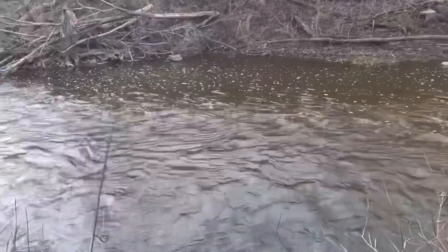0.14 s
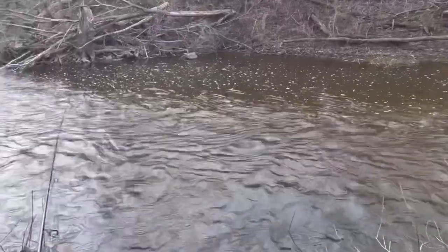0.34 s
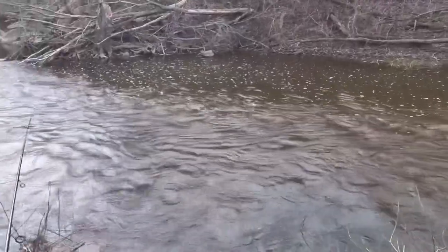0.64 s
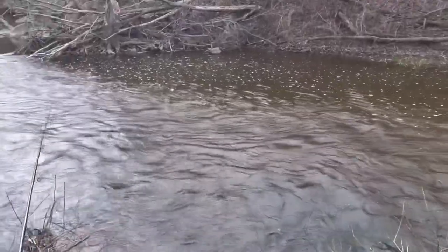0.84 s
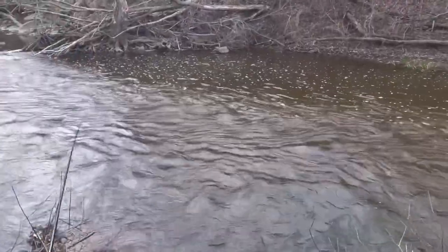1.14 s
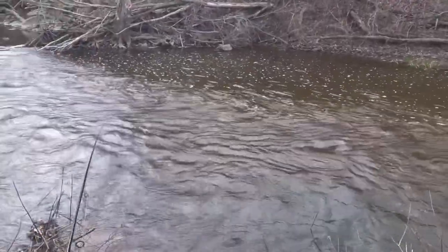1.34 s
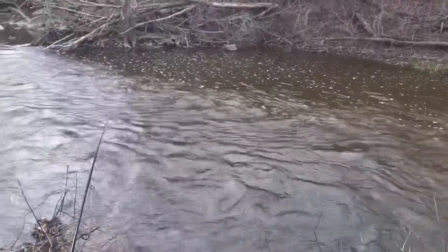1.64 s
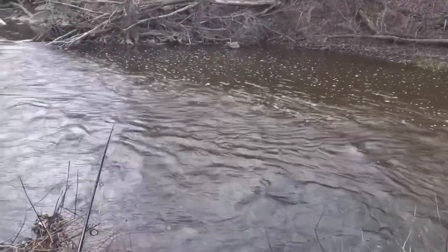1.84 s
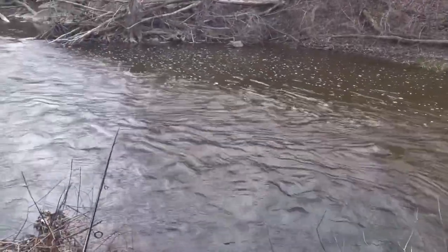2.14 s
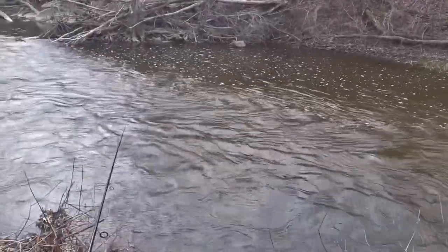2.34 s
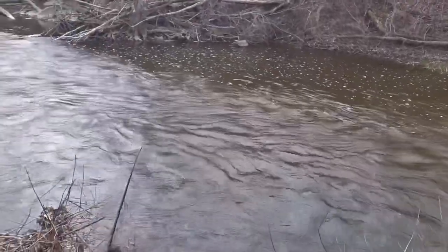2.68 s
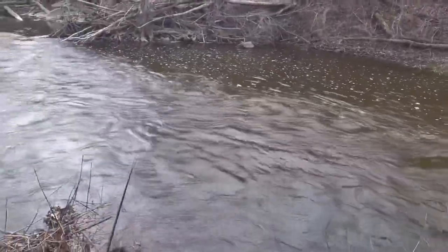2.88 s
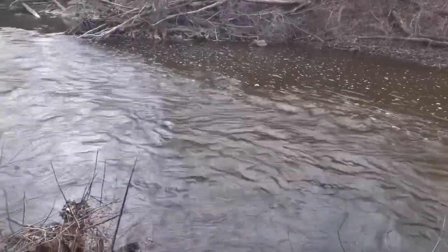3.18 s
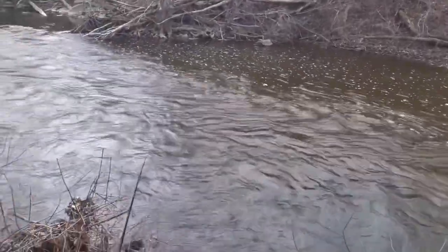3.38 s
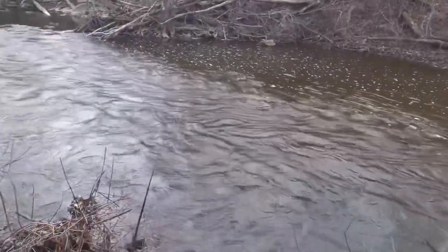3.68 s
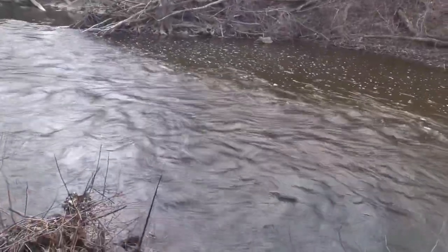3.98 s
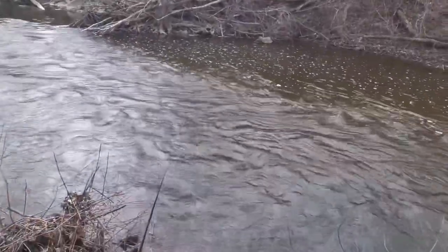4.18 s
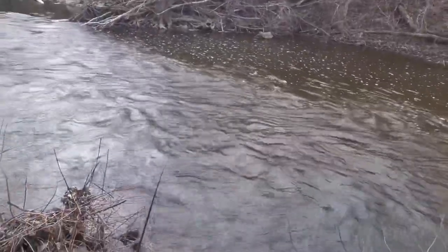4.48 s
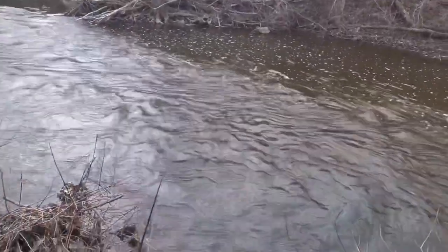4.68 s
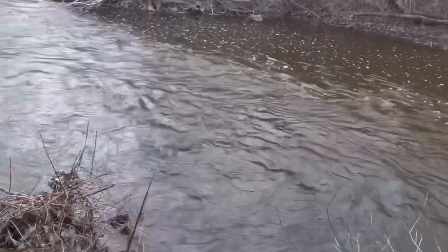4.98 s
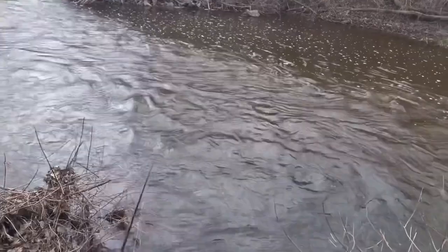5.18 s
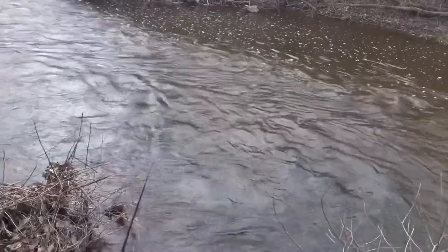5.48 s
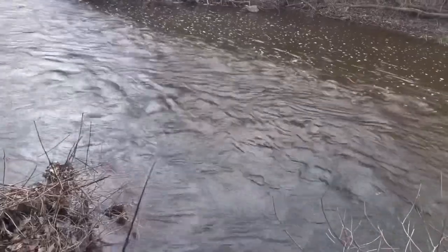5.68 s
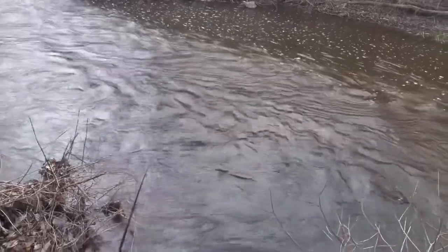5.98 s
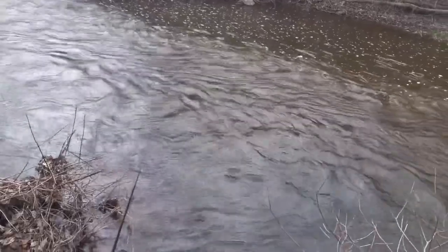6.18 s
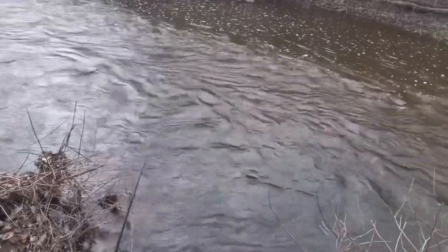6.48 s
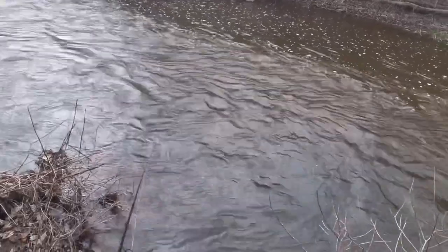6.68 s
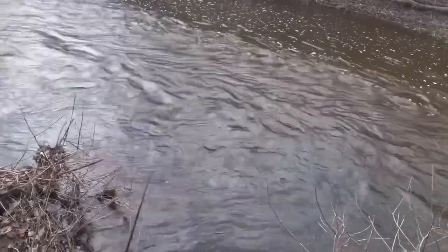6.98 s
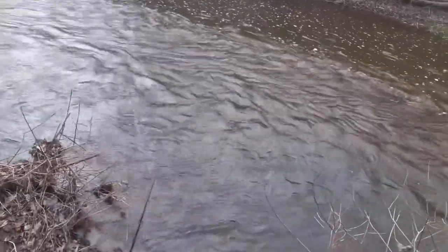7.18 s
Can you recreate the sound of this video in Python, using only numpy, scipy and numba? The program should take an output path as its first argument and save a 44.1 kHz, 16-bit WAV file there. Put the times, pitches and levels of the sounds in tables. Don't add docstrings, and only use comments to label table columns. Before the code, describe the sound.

Continuous river water runs over stones outdoors, a mid-toned wash full of gurgling bubbles, heard from the bank through a small camera's boxy stereo microphone. Deep, irregular wind buffeting shudders underneath, heavy early and again after six seconds. A brief hard scrape-click sounds almost immediately, with a much softer tick soon after and barely noticeable ones later. A very faint electronic buzz hides beneath the steady water.

```python
import sys
import numpy as np
from scipy import signal
from scipy.fft import rfft, irfft, next_fast_len
from scipy.io import wavfile
from scipy.ndimage import uniform_filter1d
from numba import njit

SR = 44100
rng = np.random.default_rng(int(sys.argv[2]) if len(sys.argv) > 2 else 0)


def makeup_ratio(level_db):
    decades = np.asarray(level_db, float) / 20
    return 10 ** decades


def to_wav(s):
    ch = np.atleast_2d(s).T
    pcm = np.round(np.clip(ch, -1, 1) * 32767)
    wavfile.write(sys.argv[1], SR, pcm.astype(np.int16))


N = 323253
T = np.arange(N) / SR
F = np.maximum(np.fft.rfftfreq(next_fast_len(N, True) // 2 * 2, 1 / SR), 1)

# t/s, level/dB
FLOW = [(0, -57), (.8, -60), (1.2, -61), (2.4, -59.5), (3.3, -58), (4, -60.5), (5.2, -61), (6.2, -60),
        (7.33, -59.5)]
# f/Hz, density/dB
WASH_SPECTRUM = [(120, -7.5), (200, 0), (657, -9.5), (851, -5), (982, 0.5), (1120, -5.5), (1650, -1.5),
                 (1800, -6), (2490, -16), (2800, -12.5), (3400, -17.5), (4070, -40), (4400, -30),
                 (5720, -66), (9680, -120)]
# f/Hz, share/1
WASH_LIKENESS = [(100, 1), (150, 0.7), (300, 0.37), (650, 0.5), (900, 0.79), (4000, .3)]
# f/Hz, left minus right/dB
WASH_PAN = [(100, 10), (160, -6), (550, -3.5), (800, -1), (3100, 8.5), (4000, -6)]
# t/s, level/dB, length/s
SURGES = [(0.28, -68, 0.049), (0.563, -65, 0.074), (0.79, -74, 0.05), (1.27, -71, 0.06),
          (1.442, -63.5, 0.07), (1.9, -79, 0.067), (2.786, -70.5, 0.26), (3.356, -66, 0.3),
          (4.18, -80.3, 0.06), (4.517, -66, 0.075), (4.688, -64, 0.049), (5.242, -68.1, 0.07),
          (5.57, -69, 0.06), (6.254, -72.5, 0.5)]
# t/s, peak level/dB, f/Hz; the short ones near 960 Hz are the lowest housing cavity
PLOPS = [(.26, -49, 960), (0.447, -53, 950), (.53, -50.5, 960), (.83, -52, 1460), (1.031, -48, 1760),
         (1.035, -52, 1490), (1.191, -54, 932), (1.335, -55, 1320), (1.391, -54.5, 1020), (2.364, -50, 970),
         (2.978, -49, 966), (3.133, -48.5, 995), (3.43, -47.5, 1620), (3.405, -52, 1680),
         (3.944, -51.5, 1170), (4.13, -56.5, 720), (4.249, -49, 970), (4.923, -50, 944), (5.229, -51, 930),
         (5.31, -54, 1560), (5.45, -50, 960), (5.618, -49.5, 980), (5.95, -54, 895), (5.76, -67, 697),
         (5.821, -50.5, 1514)]
# f/Hz, width/Hz, level/dB, left minus right/dB
CAVITIES = [(960, 79, -6, 7), (1200, 20, -4, 8.5), (1327, 125, -5, 7.5), (1434, 65, -3.5, -2.5),
            (1620, 120, -5.5, 3.5), (2078, 105, -7.5, -6), (2737, 160, -9, 1), (3000, 780, -9.5, -0.5),
            (3760, 2500, -25, 4.5)]
# f/Hz, density/dB
HISS_SPECTRUM = [(2120, -32), (3600, -3), (4190, -2), (5380, 2), (5790, -2.5), (6350, -3.5), (7020, -5),
                 (7640, -10), (7980, -13), (8420, -22), (9060, -23.5), (11800, -48), (19900, -120)]
# f/Hz, left minus right/dB
HISS_PAN = [(4000, -0.5), (4600, -3.5), (5800, 2.5), (6300, -3), (9000, 2.5), (10300, 16), (10700, 9)]
# t/s, throb level/dB, length/s, throb f/Hz
GUSTS = [(0.126, -39.5, 0.2, 22.13), (0.323, -38.5, 0.252, 29.83), (0.624, -35.5, 0.15, 28.76),
         (0.767, -36.5, 0.05, 28.04), (0.891, -41, 0.064, 23.98), (1.074, -31.5, 0.067, 25.81),
         (1.493, -39.5, 0.054, 26.44), (1.65, -38, 0.025, 26.3), (1.765, -44, 0.2, 26.5),
         (2.313, -44.5, 0.28, 25.99), (2.526, -38.5, 0.096, 28.2), (2.767, -44.5, 0.2, 24.39),
         (2.947, -42, 0.14, 28.91), (3.124, -45, 0.053, 28), (3.345, -37.5, 0.11, 26.37),
         (3.784, -41.5, 0.14, 28), (3.96, -50, 0.21, 26.64), (4.456, -47, 0.348, 30.28),
         (4.793, -44.5, 0.1, 27.78), (4.894, -45, 0.042, 28.05), (5.091, -46, 0.096, 23.54),
         (5.25, -51, 0.55, 25.01), (5.648, -41, 0.27, 25.35), (5.855, -47, 0.1, 27.34),
         (6.006, -40.5, 0.037, 23.65), (6.137, -42.3, 0.12, 22.44), (6.338, -35.2, 0.05, 28.29),
         (6.542, -53.5, 0.65, 27.9), (6.866, -42.5, 0.13, 26.84), (7.155, -45, 0.063, 25.22)]
# t/s, level/dB
BREEZE = [(.3, -60), (.55, -62.5), (.8, -64), (1.2, -61.5), (1.6, -74), (2.05, -79), (2.5, -64),
          (3.15, -72.5), (3.4, -61.5), (3.6, -79.5), (4.05, -59.5), (4.6, -67.5), (5.1, -64), (5.6, -62),
          (6.15, -74.5), (6.45, -56.5), (7.1, -72), (7.33, -55.5)]
# f/Hz, width/Hz, level/dB
BUZZ_BANDS = [(4560, 150, -91), (5200, 300, -80), (5550, 200, -83), (5990, 190, -79), (7130, 250, -91),
              (9100, 400, -110), (10180, 300, -106), (11050, 300, -104)]
# t/s, peak level/dB, f/Hz, click time/ms, width/Hz
CLICKS = [(0.036, -42, 6100, 1.4, 3500), (0.0431, -33.5, 3470, 1.1, 5900), (0.045, -28, 4450, 2.8, 6900),
          (0.0474, -23.5, 3070, 1.1, 2500), (0.0505, -29.5, 4700, 1.7, 3000), (0.053, -47, 4500, 1.5, 6000),
          (0.057, -37.5, 3540, 3.7, 5000), (0.063, -41.5, 4030, 3.7, 6000), (0.067, -46, 4830, 3.7, 2500),
          (.086, -53, 6900, 3.5, 5000), (0.108, -44, 4500, 2.1, 4000), (0.117, -60, 5500, 2.2, 2500),
          (.146, -50, 5460, 2, 4000), (0.488, -44.5, 3000, 3.9, 5000), (0.4874, -52, 8060, 2, 3500),
          (2.051, -60, 7100, 3.8, 2440), (2.997, -53, 4740, 3.5, 890), (5.37, -57.5, 6840, 3.5, 1475),
          (6.601, -61, 7800, 1.9, 1500), (7.327, -60.5, 11000, 2.3, 6060)]
# f/Hz, width/Hz, level/dB
CASE_MODES = [(2050, 64, 2.5), (2926, 135, 1), (3820, 2000, -5.5), (5000, 320, -11.5), (6900, 540, -9),
              (7800, 130, -2), (11000, 2000, -9)]

SIDES = np.array([[1], [-1]])


def unit(x):
    return x / np.sqrt(np.mean(x ** 2))


def spectrum(table):
    hz, value = np.transpose(table)
    return np.interp(np.log(F), np.log(hz), value)


def envelope(table):
    s, value = np.transpose(table)
    return np.interp(T, s, value)


def ring(hz, width):
    return 1 / (1 + 1j * (F ** 2 - hz ** 2) / (F * width))


def shape(x, response):
    size = 2 * len(F) - 2
    return irfft(rfft(x, size) * response, size)[..., :N]


def walk(rate):
    k = int(SR / rate)
    held = np.repeat(rng.standard_normal(N // 100), k)[:N]
    return unit(uniform_filter1d(uniform_filter1d(held, k), k))


def restless(swell_db, flicker_db, channels=1):
    out = 0
    for hz in 60 * 2 ** np.arange(0, 8, .5):
        mask = np.cos(np.pi * np.clip(np.log2(F / hz), -.5, .5))
        band = shape(rng.standard_normal((channels, N)), mask)
        out = out + band * makeup_ratio(swell_db * walk(1.614) + flicker_db * walk(14))
    return out


def swells(s, db, length_s):
    age = (T - s[:, None]) / length_s[:, None]
    return makeup_ratio(db)[:, None] * np.exp(-4 * np.log(2) * age ** 2)


@njit
def bubbles(start, hz, cycles, size, glide, n):
    out = np.zeros(n)
    for k in range(len(start)):
        life = cycles[k] * SR / hz[k]
        phase = 0.
        for i in range(min(int(5 * life), n - start[k])):
            phase += 2 * np.pi * hz[k] * (1 + glide * i / life) / SR
            fade = np.exp(-i / life) * (1 - np.exp(-8 * i / life))
            out[start[k] + i] += size[k] * fade * np.sin(phase)
    return out


def wash():
    mid, side = restless(0.68, 1.9, channels=2)
    like = np.clip(spectrum(WASH_LIKENESS), 0, 1)
    colour = makeup_ratio(spectrum(WASH_SPECTRUM) + SIDES * spectrum(WASH_PAN) / 2)
    common = shape(mid, colour * np.sqrt(1 + like))
    opposed = shape(side, colour * np.sqrt(1 - like))
    return unit(common + SIDES * opposed)


def drone():
    surge = makeup_ratio(-68.5) + swells(*np.transpose(SURGES)).sum(axis=0)
    deep = rng.standard_normal((2, N))
    modes = ring(159.6, 41) ** 2 + 0.75 * ring(183.0, 70) ** 2
    tone = unit(shape(deep[0] + 0.39 * SIDES * deep[1], modes))
    return makeup_ratio(-0.4) * surge * tone * makeup_ratio(-1.8 * SIDES)


def riffle(riffle_db):
    when, pitch, decay, rarity = rng.random((7000, 4)).T
    start = (when * N).astype(np.int64)
    size = makeup_ratio(-1.7 * np.log(rarity))
    froth = bubbles(start, 800 * 4 ** pitch ** 1.5, 3 + 5 * decay, size, .03, N)
    s, db, hz = np.transpose(PLOPS)
    plops = bubbles((s * SR).astype(np.int64), hz.copy(), np.full(len(s), 6.), makeup_ratio(db + 1), .02, N)
    stream = makeup_ratio(riffle_db) * unit(unit(froth) * .9 + unit(restless(.8, .8)[0]))
    cavities = sum(makeup_ratio(db + SIDES * pan / 2) * ring(hz, width) ** 2 for hz, width, db, pan in CAVITIES)
    lag = np.exp(-1j * np.pi * F * SIDES * 70e-6)
    return shape(stream, cavities * lag * makeup_ratio(12.0)) + shape(plops, lag) * makeup_ratio(SIDES * 2.0 + 2.0)


def hiss():
    notches = (1 - .85 * ring(10600, 350)) * (1 - .5 * ring(9550, 300)) * (1 - .6 * ring(12000, 900))
    centre, wide = restless(1.0, 0.54, channels=2)
    colour = makeup_ratio(spectrum(HISS_SPECTRUM) + SIDES * spectrum(HISS_PAN) / 2)
    return unit(shape(centre + 0.11 * SIDES * wide, notches * colour))


def water():
    riffle_db = envelope(FLOW)
    swing_db = riffle_db - riffle_db.mean()
    wash_db = -71 + 0.18 * swing_db
    hiss_db = -69 + 0.2 * swing_db
    near = makeup_ratio(wash_db + 10.5) * wash() + drone() + riffle(riffle_db)
    return near + makeup_ratio(hiss_db - 0.3) * hiss()


def wind():
    s, db, length_s, pitch = np.transpose(GUSTS)
    gusts = swells(s, db, length_s)
    breeze_db = envelope(BREEZE)
    lull = makeup_ratio(-53 + 0.2 * (breeze_db - breeze_db.mean()))
    strength = gusts.sum(axis=0) + lull
    hz = (pitch @ gusts + pitch.mean() * lull) / strength
    rock = np.sin(2 * np.pi * np.cumsum(0.98 * hz * (1 + 0.1996 * walk(25))) / SR)
    sway = shape(rng.standard_normal(N), ring(29, 33) ** 2)
    flutter = shape(rng.standard_normal((2, N)), ring(31, 40) * ring(50, 50)) * makeup_ratio(5.2 * walk(30))
    trend = uniform_filter1d(strength, size=16000)
    motion = strength * unit(rock) + .65 * trend * unit(sway)
    throb = shape(motion, 1 / (1 + (F / 47) ** 6))
    apart = makeup_ratio(-28.5) * unit(sway[::-1]) * SIDES
    flutter = unit(flutter[0] + .1 * flutter[1] * SIDES)
    flutter_level = makeup_ratio(breeze_db + 3.5) * (strength / trend) ** 0.27
    return makeup_ratio(0.2) * (throb + strength * apart) + flutter_level * flutter


def buzz():
    frame_hz = 60000 / 1001
    ticks, clock = np.zeros((2, N))
    frames = np.arange(int(N / SR * frame_hz))
    ticks[np.round((frames + .93) * SR / frame_hz).astype(int)] = 1
    clock[np.round(np.arange(.031, N / SR, .1582) * SR).astype(int)] = 1
    chirp = makeup_ratio(-102) * unit(shape(clock, ring(11780, 200) ** 2 + .8 * ring(12260, 200) ** 2))
    frame = sum(makeup_ratio(db) * unit(shape(ticks, ring(hz, width) ** 2)) for hz, width, db in BUZZ_BANDS)
    right = shape(frame, 1 / (1 + (F / 10400) ** 30))
    return np.array([(frame + chirp) * makeup_ratio(-.6), right * makeup_ratio(.8)])


def clicks():
    case = sum(makeup_ratio(db) * ring(hz, width) for hz, width, db in CASE_MODES) + makeup_ratio(-23)
    case = case * (makeup_ratio(-23) + 1 / (1 + (F / 8800) ** 14))
    difference = (ring(2800, 1600) ** 2 + .15) * .5 * SIDES
    out = np.zeros((2, N))
    for s, db, hz, ms, width in CLICKS:
        age = (T - s) * 1000 / ms
        tap = np.exp(-np.abs(age) * np.where(age < 0, 1.6, 1))
        near, far = np.sign(rng.standard_normal((2, N))) * tap
        colour = case * ring(hz, width) ** 2
        rung = shape(near, colour) + shape(far, colour * difference)
        out += makeup_ratio(db - 2.0) * rung / np.max(np.abs(rung.mean(axis=0)))
    return out


def scene():
    return water() + wind() + buzz() + clicks()


def low_pass(x):
    return signal.sosfilt(signal.butter(12, 12350, fs=SR, output="sos"), x)


def record(dry):
    mid, side = (dry[0] + dry[1]) / 2, (dry[0] - dry[1]) / 2
    bass_db = 10 * np.log10(uniform_filter1d(mid ** 2, size=2000) + 1e-12)
    treble_db = 10 * np.log10(uniform_filter1d(shape(mid, F > 6500) ** 2, size=900) + 1e-12)
    spared_db = 4 * np.maximum(treble_db + 72, 0)
    for low in np.arange(5600, 12600, 700):
        band = 1. * (F >= low) * (F < low + 700)
        strain_db = bass_db - spared_db + 4.5 * walk(32)
        mid_limit = np.interp(low, [7500, 9000, 12000], [-10, -36, -43])
        side_limit = np.interp(low, [5600, 6300, 7000, 7700, 12000], [-40, -56, -56, -36, -41])
        mid = mid - shape(mid, band) * np.clip((strain_db - mid_limit) / 2, 0, .97)
        side = side - shape(side, band) * np.clip((strain_db - side_limit) / 2, 0, .95)
    return low_pass(np.array([mid + side, mid - side]))


dry = scene()
out = record(dry)
to_wav(out)
```